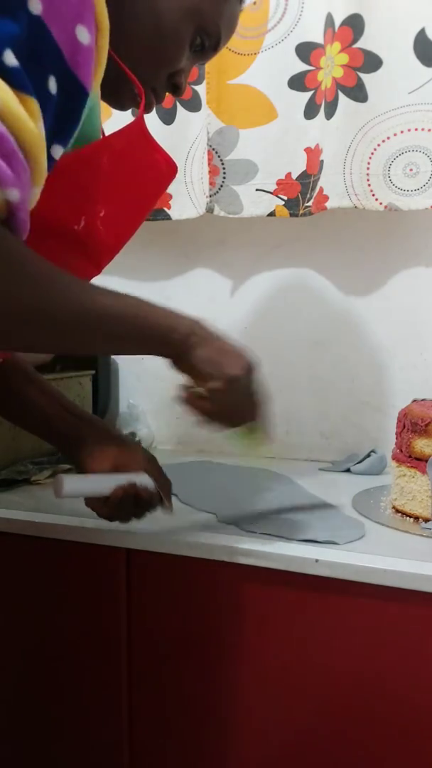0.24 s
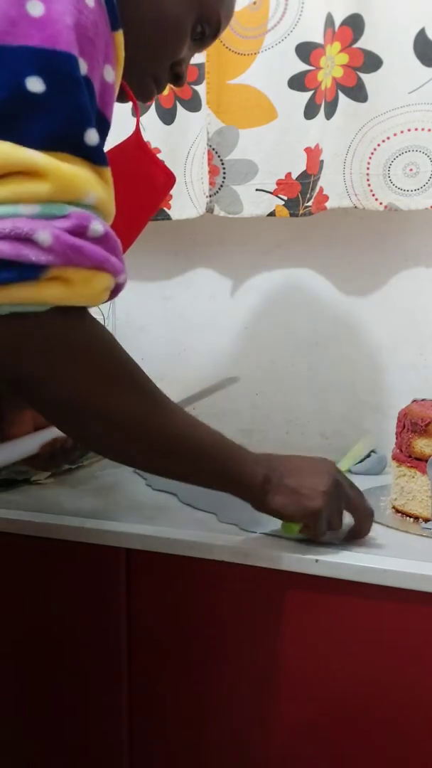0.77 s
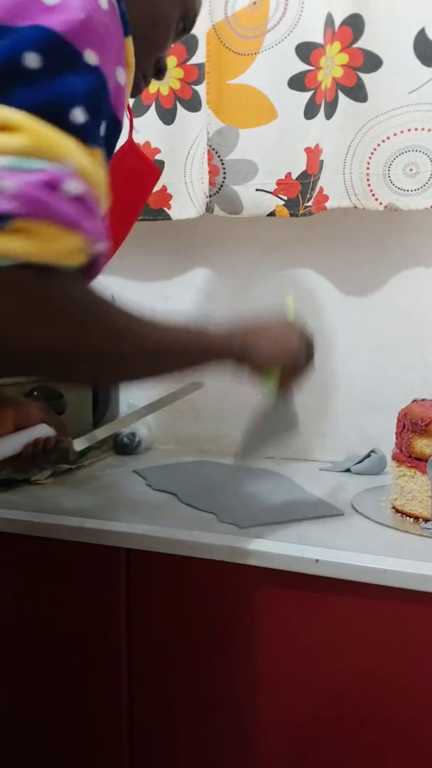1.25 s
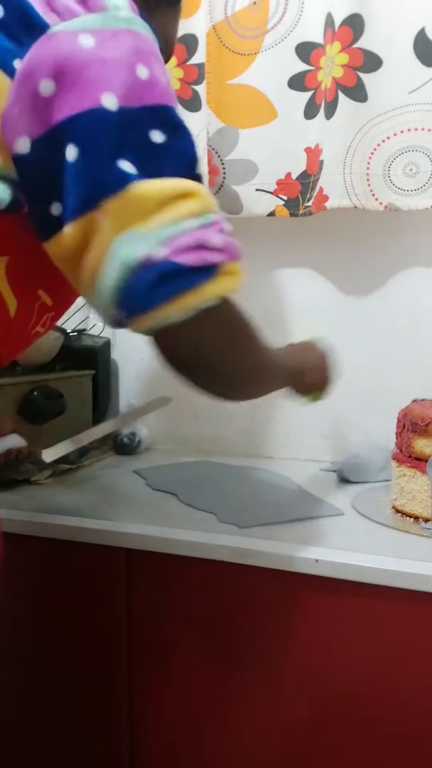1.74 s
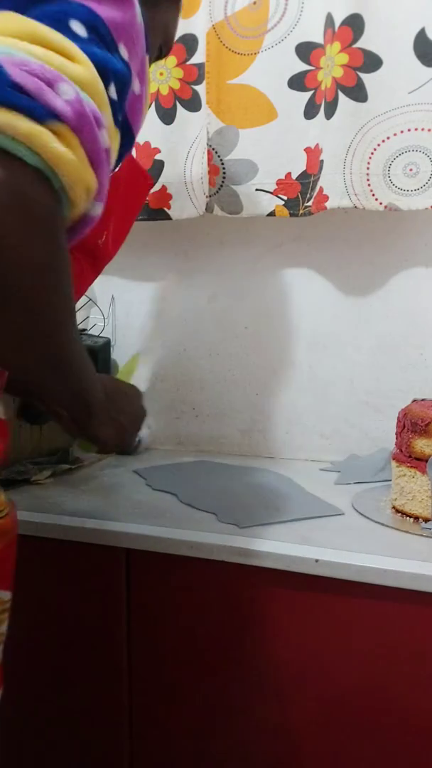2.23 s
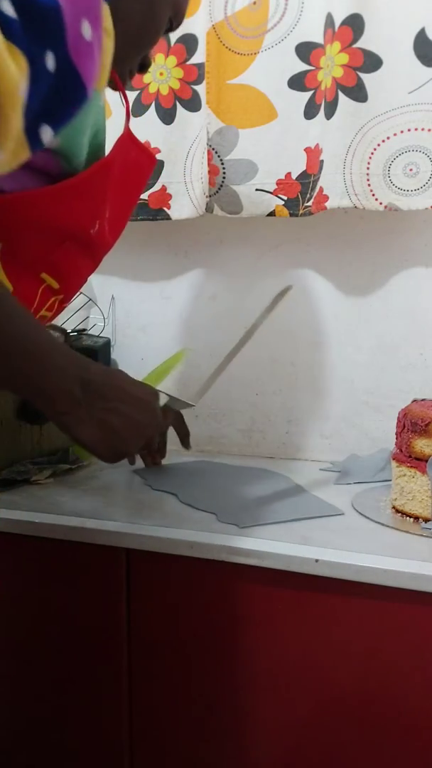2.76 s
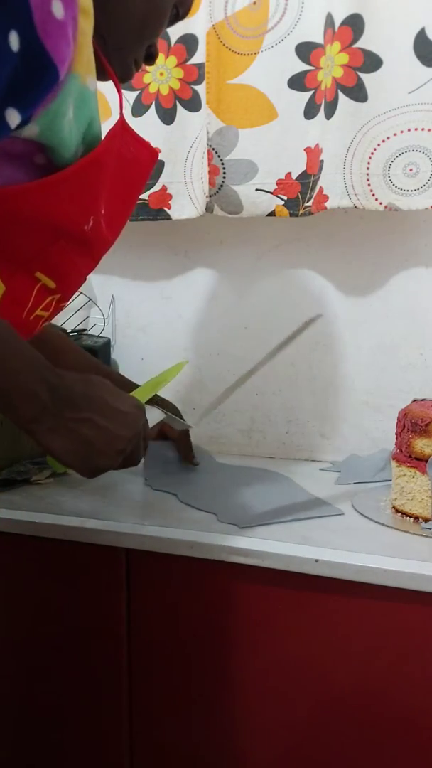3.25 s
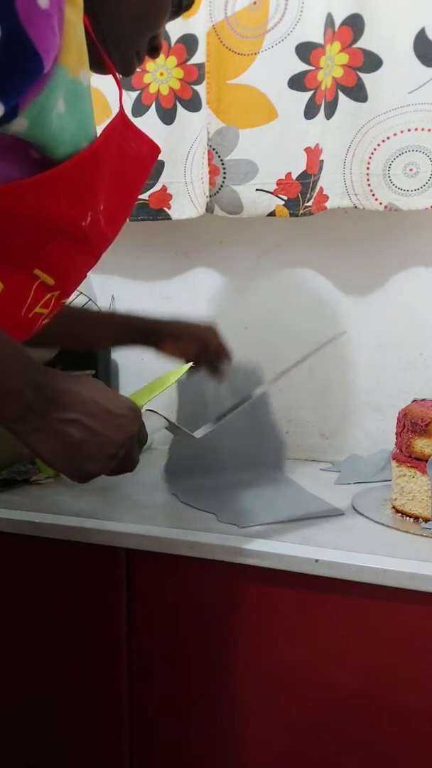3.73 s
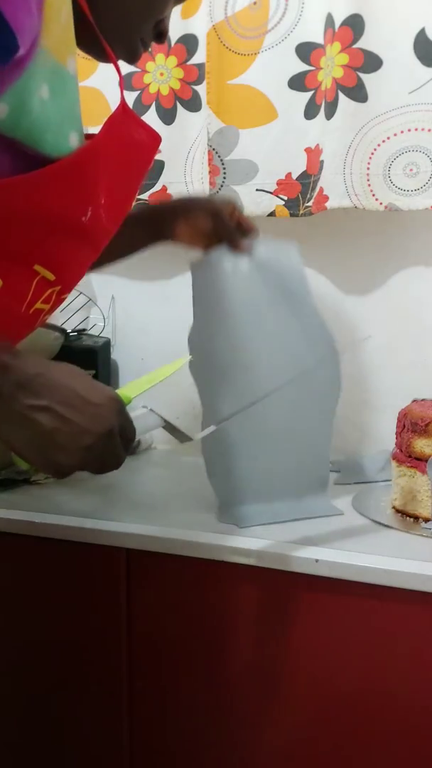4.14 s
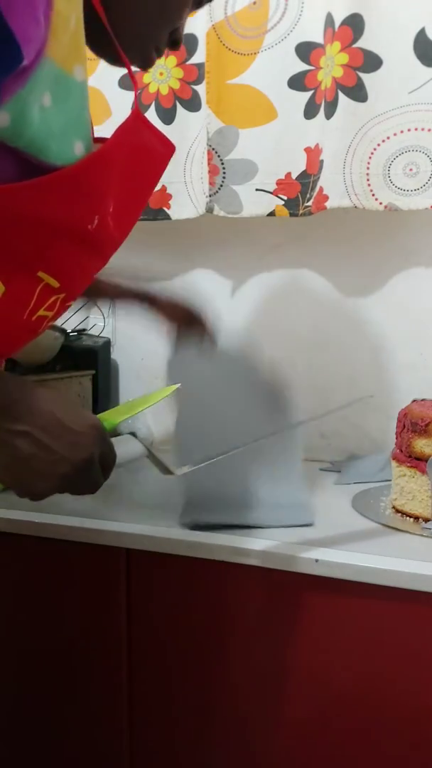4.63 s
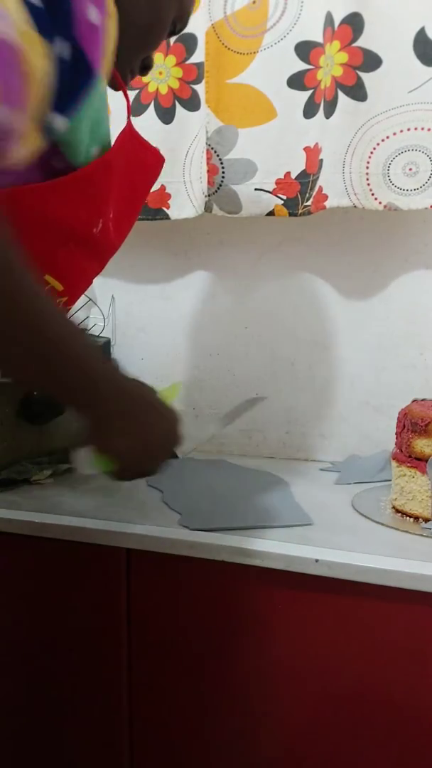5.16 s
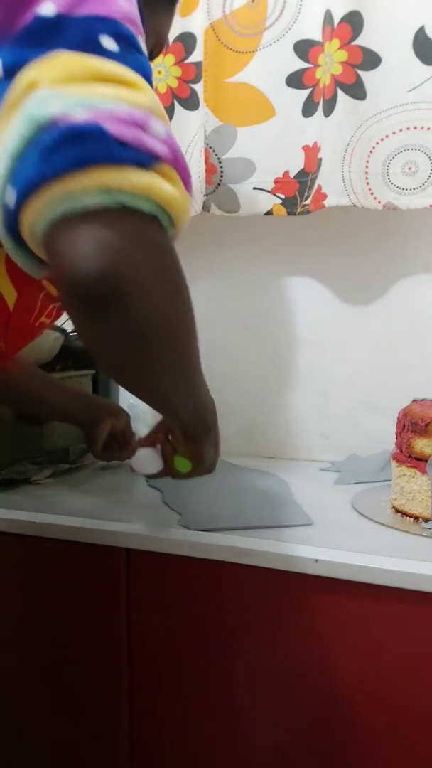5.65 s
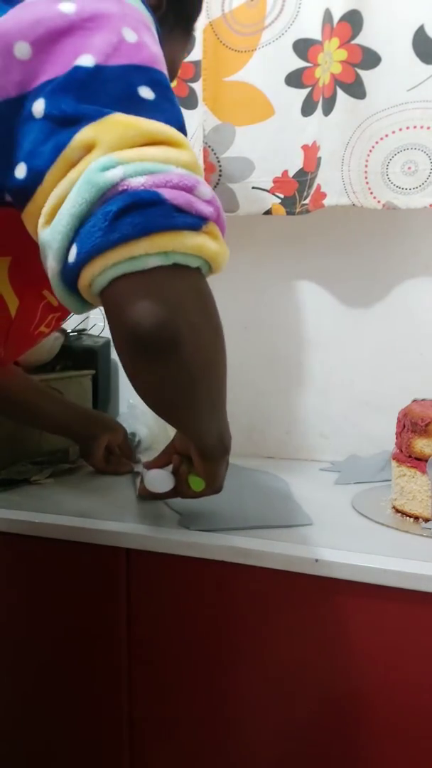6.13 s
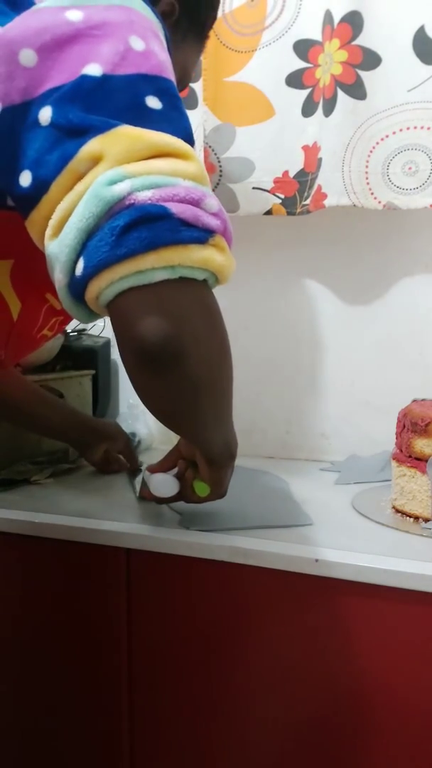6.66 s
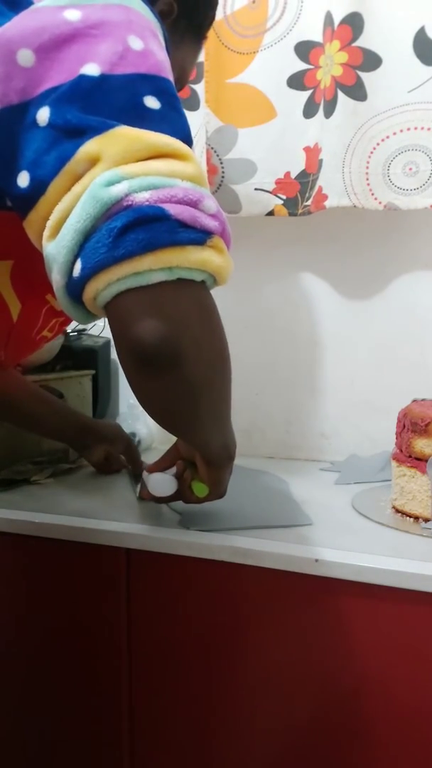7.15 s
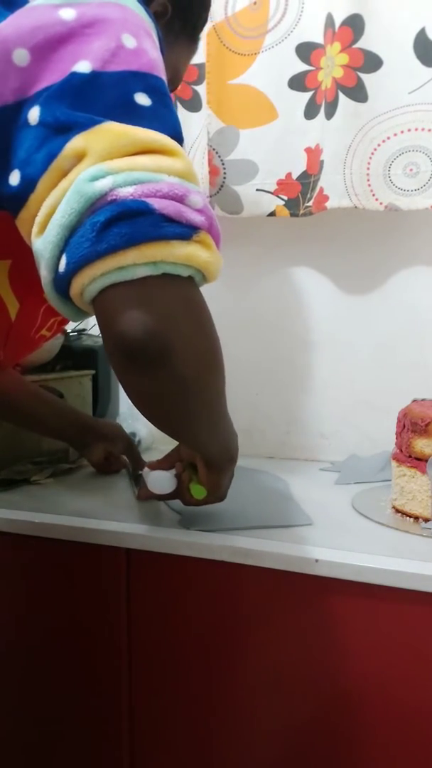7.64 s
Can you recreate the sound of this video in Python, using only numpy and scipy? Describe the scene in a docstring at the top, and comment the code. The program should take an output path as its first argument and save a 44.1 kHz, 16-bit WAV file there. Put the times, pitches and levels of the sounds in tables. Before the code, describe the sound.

A small hard-walled kitchen, heard fairly close in stereo, with a deep refrigerator hum near 100 Hz swelling and sinking over dull, dark room air. Right at 0 s a knife edge scrapes for about 0.15 s, gritty and uneven, with small catches and a slight blade ring. At 0.7 s a soft low boom comes from the counter. Faint cloth rustles pass by. At about 1.73 s tools knock together in a dry clustered clink lasting some 50 ms, mid-bright and quickly fading. Around 3.45-3.55 s there are soft finger touches with a low thump, then a very fine peeling hiss until about 4.4 s. At 4.6-4.8 s the sheet lands in a few louder soft pats with a low thud. After 5 s it is mostly hum, with faint rustles, including one airy brush near 6.4 s, and tiny dull taps near 7.27 s, until the end at about 7.9 s.

```python
"""A knife scrapes once through rolled icing on a kitchen counter: jerky slips of the edge, partly ringing in the blade.
Tools clink as struck resonances; the sheet is peeled up and laid down in soft pats, low counter booms and fine hiss.
A small hard kitchen answers scrape, clinks and pats with sparse echoes, heard by two unlike microphone ports.
Behind it a refrigerator hums on multiples of the mains over dull room air of shaped noise."""
import sys
import numpy as np
from scipy import signal
from scipy.fft import rfft, irfft, next_fast_len
from scipy.io import wavfile
from scipy.ndimage import uniform_filter1d

SR = 44100
rng = np.random.default_rng(int(sys.argv[2]) if len(sys.argv) > 2 else 0)


def pcm_store(signal):
    """Save signal as 16-bit PCM."""
    levels = np.round(np.clip(np.atleast_2d(signal), -1, 1) * 32767)
    wavfile.write(sys.argv[1], SR, levels.astype(np.int16).T)


N = 347949  # length in samples


def gain_of(db):
    """Decibels to gain."""
    return 10 ** (np.asarray(db) / 20)


def evened(x):
    """Scales to rms 1."""
    return x / np.sqrt(np.mean(x ** 2) + 1e-20)


def curve(points, t):
    """Reads a breakpoint table along a straight axis."""
    return np.interp(t, *np.transpose(points))


def read(points, hz):
    """Reads a spectrum table on a log axis."""
    f, value = np.transpose(points)
    return np.interp(np.log(hz + 1), np.log(f + 1), value)


def add(mix, s, sound):
    """Mixes a sound in at a time in seconds."""
    part = mix[round(s * SR):][:len(sound)]
    part += sound[:len(part)]


def coloured(x, points):
    """Filters by a spectrum table."""
    count = x.shape[-1]
    size = next_fast_len(count + 2048)
    gain = gain_of(read(points, np.fft.rfftfreq(size, 1 / SR)))
    return irfft(rfft(x, size) * gain, size)[..., :count]


def ringing(x, modes):
    """Sum of resonances, each of peak gain by its dB."""
    out = 0
    for hz, width, db in modes:
        b, a = signal.iirpeak(hz, hz / max(width, 5), SR)
        out = out + gain_of(db) * signal.lfilter(b, a, x)
    return out


def gliding(x, hz, width):
    """A resonance that follows the curve hz: shift down to zero, smooth, shift back up."""
    turn = np.exp(2j * np.pi * np.cumsum(hz) / SR)
    r = np.exp(-np.pi * width / SR)
    return 2 * (turn * signal.lfilter([1 - r], [1, -r], x / turn)).real


def grit(count, spread_db):
    """Noise of tiny slips, a few of them large."""
    size_db = spread_db * np.minimum(rng.exponential(1, count), 5)
    return evened(rng.standard_normal(count) * gain_of(size_db))


def slow(per_s):
    """A smooth random drift of rms 1, made of sines up to per_s Hz."""
    t = np.arange(0, N + 256, 256) / SR
    drift = 0
    for f in np.geomspace(per_s / 10, per_s, 16):
        drift = drift + np.sin(2 * np.pi * (f * t + rng.random())) / np.sqrt(f)
    return np.interp(np.arange(N), 256 * np.arange(len(t)), evened(drift))


# Pressure of the knife stroke. Each row: time in seconds, pressure in dB.
STROKE_PRESSURE = [(0, -28), (0.038, -30.5), (0.045, -27), (0.1, -29), (0.12, -24), (0.133, -30),
                   (0.15, -43)]
# The edge catches and jumps. Each row: time in seconds, added pressure in dB.
EDGE_CATCHES = [(0.045, -24.5), (0.057, -29), (0.069, -28.5), (0.077, -30), (0.098, -28), (0.111, -25.5),
                (0.118, -27), (0.13, -25), (0.139, -23.5)]
# Colour of the dry scrape. Each row: frequency in Hz, relative level in dB per Hz.
SCRAPE_COLOUR = [(120, -39.5), (200, -14.5), (462, -8), (677, -7.5), (939, -1.5), (1190, -10.5), (1500, -9),
                 (1940, -1.5), (3120, -4), (4100, -1), (11800, -9), (15400, -13.5)]
# Modes of blade and counter. Each row: centre in Hz before bending, width in Hz, relative gain in dB.
BLADE_MODES = [(444, 40, -4.5), (576, 55, 2), (780, 60, -1), (938, 39, 1.5), (1090, 55, 0),
               (1980, 230, -4.5), (2260, 62, -3), (4050, 85, -6.5), (4290, 45, 0.5), (4940, 60, -8),
               (7120, 190, -1.5), (5840, 55, -9), (11100, 86, -8)]
# Low note of the bending blade. Each row: time in seconds, pitch in Hz.
GROAN_PITCH = [(0, 483.4), (0.03, 319.6), (0.065, 281.6), (0.1, 451.5), (0.125, 597), (0.19, 539.5)]


def scrape(ring_db=-10.5, groan_db=-21, groan_width_hz=60., spread_db=3.0, bright=0.49, catch_s=.002, bend=.025):
    """Slips of the edge on the counter in uneven jerks, partly ringing in the blade."""
    s, pressure_db = np.transpose(STROKE_PRESSURE)
    t = np.arange(0, s[-1], 1 / SR)
    force = gain_of(curve(STROKE_PRESSURE, t))
    for at, jump_db in EDGE_CATCHES:
        force += gain_of(jump_db) * (t > at) * np.exp(-abs(t - at) / catch_s)
    slips = np.pad(grit(len(t), spread_db) * force, (0, SR // 4))  # room for the ring to die

    t = np.arange(len(slips)) / SR
    pressure = gain_of(curve(STROKE_PRESSURE, t) - pressure_db.max())
    slips += bright * np.diff(slips, prepend=0) * pressure  # pressure brightens
    level = np.linalg.norm(slips)
    dry = coloured(slips, SCRAPE_COLOUR)

    flex = 1 + bend * slow(40.0)[:len(t)]  # the blade bends, so its modes drift
    ring = sum(gain_of(db) * gliding(slips, hz * flex, width) for hz, width, db in BLADE_MODES)
    groan = gliding(slips, curve(GROAN_PITCH, t), groan_width_hz)
    parts = (0, dry), (ring_db, ring), (groan_db, groan)
    return level * sum(gain_of(share_db) * part / np.linalg.norm(part) for share_db, part in parts)


# Tools knocked together. Each row: start in seconds, relative level in dB.
CLINK_HITS = [(1.729, -36.5), (1.733, -27), (1.740, -26), (1.750, -26.5), (1.76, -34), (1.77, -39),
              (1.781, -40)]
# Resonances of the tools. Each row: centre in Hz before detuning, width in Hz, relative gain in dB.
TOOL_MODES = [(714, 230, -22), (1070, 130, -6), (1290, 90, 1), (2050, 93, 8), (2320, 120, -6),
              (2640, 90, 7), (3000, 140, -5), (3610, 120, -11), (4000, 200, -17), (6700, 300, -7)]
# Colour of the dull crack. Each row: frequency in Hz, relative level in dB per Hz.
CRACK_COLOUR = [(300, -3.5), (1200, 0), (2200, 9), (5000, -7.5), (8000, -15), (15000, -43)]


def clinks(tick_db=3.0, tick_s=0.0025, detune=.018):
    """Each knock is a short dull crack that also rings the tools, held a little differently each time."""
    out, t = np.zeros(N), np.arange(SR // 10) / SR
    for s, db in CLINK_HITS:
        blow = grit(len(t), 1.6) * np.exp(-t / tick_s)
        # only the centre column is detuned
        hold = 1 + detune * rng.standard_normal((len(TOOL_MODES), 1)) * [1, 0, 0]
        ring = ringing(blow, np.array(TOOL_MODES) * hold)
        crack = coloured(blow, CRACK_COLOUR)
        knock = ring / abs(ring).max() + gain_of(tick_db) * crack / abs(crack).max()
        add(out, s, gain_of(db) * knock)
    return out


# The sheet and fingers meet the counter. Each row: start in seconds, relative level in dB, length in seconds,
# dull centre in Hz, share near 5 kHz in dB, share near 13 kHz in dB, share of the note in dB.
SOFT_TOUCHES = [(3.443, -56, 0.015, 2620, -8, -22, -10), (3.452, -51.5, 0.04, 1310, -16, -28, -16),
                (3.46, -58, 0.039, 2860, 0, -11, -4), (3.49, -57, .008, 2200, -6, -11, -18),
                (3.523, -51.5, 0.014, 2000, 8, 4, -25), (3.541, -61, 0.053, 1100, -2, -2, -5),
                (4.593, -50.5, 0.012, 1700, -26, -31, -23), (4.609, -51, 0.011, 1150, -14, -22, -22),
                (4.625, -52, 0.011, 1250, -13, -28, -22), (4.683, -39, 0.013, 1500, 2.5, -4, -25),
                (4.704, -41, 0.023, 1390, -6, -15, -26), (4.73, -40.5, 0.0094, 1910, -4, -8, -18),
                (4.773, -51, 0.017, 2600, -4, -13, -20), (4.812, -63.5, .04, 2000, -3, -12, -19),
                (7.258, -56.5, 0.0053, 2130, -29, -44, -7), (7.274, -60, 0.011, 870, -25, -44, 2),
                (7.288, -65, 0.016, 2200, -29, -44, -15)]


def pats(fall_s=0.011, first=1.6, first_s=0.00029, sharp=12.0):
    """Soft contact: a burst of grit with a broad dull hump, a share of treble and a short note at the hump."""
    out, t = np.zeros(N), np.arange(SR // 5) / SR
    for s, db, length, hz, mid_db, top_db, note_db in SOFT_TOUCHES:
        hold = np.exp(-np.maximum(t - length, 0) / fall_s)
        snap = first * np.exp(-t / first_s)  # the first touch snaps
        onset = np.minimum(t / 0.00032, 1)
        hump = [(hz / 4, -8), (hz, 0), (hz * 1.1, .5 * mid_db),
                (5000, mid_db), (8800, top_db + 2.5), (13000, top_db)]
        touch = grit(len(t), 2.2)
        note = evened(ringing(touch, [(hz, hz / sharp, 0)]))
        sound = evened(coloured(touch, hump)) + gain_of(note_db) * note
        add(out, s, gain_of(db) * sound * (hold + snap) * onset)
    return out


# Low booms of the counter top, and two faint swells near 490 Hz in the background (at 1.029 and 2.151 s).
# Each row: start in seconds, level before rise and decay in dB, pitch in Hz, 60 dB decay in seconds.
BOOMS_AND_SWELLS = [(0.68, -28, 95.5, 0.69), (1.731, -43.5, 488, 0.11), (1.735, -46, 704, 0.066),
                    (3.463, -31, 259, 0.083), (3.491, -22.5, 124, 0.069), (4.676, -25, 97, 0.1),
                    (4.681, -35.5, 270, 0.07), (4.729, -44, 395, 0.1), (1.029, -52, 497, 0.2),
                    (2.151, -43, 487, 0.05)]


def booms(rise_cycles=0.93):
    """Each boom or swell is one decaying sine with a soft rise, like a panel mode pushed gently."""
    out, t = np.zeros(N), np.arange(SR // 2) / SR
    for s, db, hz, t60 in BOOMS_AND_SWELLS:
        rise = 1 - np.exp(-t * hz / rise_cycles)
        add(out, s, gain_of(db - 60 * t / t60) * rise * np.sin(2 * np.pi * hz * t))
    return out


# Single rubs of cloth and icing. Each row: loudest moment in seconds, length in seconds,
# relative level near 6 kHz in dB, relative level near 13 kHz in dB.
CLOTH_RUBS = [(0.318, 0.11, -85, -72), (0.448, 0.13, -69, -68), (0.72, 0.057, -78, -74.5),
              (0.82, 0.19, -72.5, -82.5), (0.909, 0.18, -73, -74), (1.132, 0.17, -70, -64),
              (1.652, 0.62, -71, -89), (2.058, 0.13, -67, -74), (2.198, 0.28, -72.5, -75),
              (2.31, 0.14, -73.5, -79), (2.697, 0.066, -75, -68), (2.98, 0.042, -75, -80),
              (3.157, 0.17, -75, -68), (3.28, 0.049, -69, -75), (4.862, 0.22, -71, -73),
              (6.158, 0.073, -77.5, -76), (6.412, 0.098, -71, -61.5), (7.185, 0.07, -74, -73),
              (7.278, .06, -95, -75), (7.468, 0.038, -81, -75), (7.71, 0.077, -83, -95)]
RUB_RISE, RUB_END_DB = 0.37, -8.5  # share of the length spent rising; level at both ends
# The sheet is peeled off the counter.
# Each row: time in seconds, relative level near 6 kHz in dB, relative level near 13 kHz in dB.
PEEL_LEVELS = [(3.42, -77, -79), (3.58, -66, -62), (3.72, -72, -58.5), (3.88, -74, -61), (4.09, -79, -67),
               (4.33, -74, -65.5), (4.42, -79, -93)]
# Faint stirring between the rubs, strongest at the very start.
# Each row: time in seconds, relative level near 6 kHz in dB, relative level near 13 kHz in dB.
STIR_LEVELS = [(0, -72, -76.5), (1.2, -82, -83), (3.4, -79, -82), (4.5, -81, -87.5), (7.89, -83, -86.5)]


def rustle_levels(t, stir_db=2.5):
    """Gains of the two hiss bands: rubs arch up and down, the peel follows its curve, the stirring drifts."""
    stir_s, *stir_bands = np.transpose(STIR_LEVELS)
    peel_s, *peel_bands = np.transpose(PEEL_LEVELS)
    power = gain_of([np.interp(t, stir_s, band) + stir_db * slow(4.4)[::64] for band in stir_bands]) ** 2
    power += gain_of([np.interp(t, peel_s, band, -200, -200) for band in peel_bands]) ** 2
    for s, length, *levels_db in CLOTH_RUBS:
        away = (t - s) / np.where(t < s, RUB_RISE * length, (1 - RUB_RISE) * length)
        arch_db = RUB_END_DB * np.minimum(away ** 2, 20)
        power += gain_of(np.array(levels_db)[:, None] + arch_db) ** 2
    return np.sqrt(power)


# Colour of the lower hiss. Each row: frequency in Hz, relative level in dB per Hz.
SWISH_COLOUR = [(1500, -14), (3600, -11.5), (5000, -6), (7000, -2), (8300, -15.5), (11000, -23)]
# Colour of the upper hiss. Each row: frequency in Hz, relative level in dB per Hz.
FIZZ_COLOUR = [(5000, -33), (9000, -13), (11500, -2), (14500, 1.5), (16000, 4)]
# While the arm sweeps wide the rustle also whistles. Each row: centre in Hz, width in Hz, relative gain in dB.
WHISTLE_MODES = [(4200, 450, 0)]
# How much of it whistles. Each row: time in seconds, mean share in dB.
WHISTLE_AMOUNT = [(2.4, -10), (2.8, -20)]


def rustle(flicker_db=1.5):
    """Fibres and sticky icing let go in a fine hiss, unrelated in the two ports."""
    t = np.arange(N) / SR
    levels = rustle_levels(t[::64]).repeat(64, 1)[:, :N]
    swish_gain, fizz_gain = levels * gain_of(flicker_db * slow(40.0))
    fibres = grit(2 * N, 1.5).reshape(2, N)
    whistle_db = curve(WHISTLE_AMOUNT, t) + 2.5 * slow(25.0)  # comes and goes
    whistle = evened(ringing(fibres, WHISTLE_MODES)) * gain_of(whistle_db)
    swish = evened(coloured(fibres, SWISH_COLOUR)) + whistle
    fizz = evened(coloured(fibres, FIZZ_COLOUR))
    return swish * swish_gain + fizz * fizz_gain


# Decay of the small hard kitchen. Each row: frequency in Hz, 60 dB decay in seconds.
KITCHEN_DECAY = [(300, 0.3), (1000, 0.21), (4000, 0.19), (12000, 0.19)]
# Long waves reach both ports alike. Each row: frequency in Hz, left-right likeness from 0 to 1.
ECHO_LIKENESS = [(200, 0.9), (450, 0.81), (1000, 0.16)]


def echoes():
    """Sparse taps of random sign, alike in both ports only in the bass, each band dying at its own speed."""
    taps = np.zeros((2, SR // 2))
    starts = np.arange(60, SR // 2 - 20, 20)  # one tap in every 20 samples
    at = starts + rng.integers(0, 20, (2, len(starts)))
    np.put_along_axis(taps, at, rng.choice([-1., 1.], at.shape), 1)
    hz, t, z = signal.stft(taps, SR, nperseg=256)
    same = np.clip(read(ECHO_LIKENESS, hz), 0, 1)[:, None]
    z = np.array([z[0], same * z[0] + np.sqrt(1 - same ** 2) * z[1]])
    decay = gain_of(-60 * t / read(KITCHEN_DECAY, hz)[:, None])
    tail = signal.istft(z * decay, SR, nperseg=256)[1]
    return tail / np.linalg.norm(tail[0])


def kitchen(x, turns_per_s=28.0):
    """Three sets of echoes fade into one another in turn, so the room's colour keeps changing."""
    turn = 2 * np.pi * turns_per_s * np.arange(N) / SR
    out = 0
    for k in range(3):
        share = np.sqrt(2 / 3) * np.cos(turn + k * np.pi / 3)  # the three powers add up to 1
        out = out + signal.fftconvolve(x[None] * share, echoes(), axes=1)[:, :N]
    return out


MAINS_HZ = 50.018
# The hum swells and sinks; its strongest partial, twice the mains. Each row: time in seconds, rms level in dB.
DRONE_LEVEL = [(0.0, -32), (0.75, -33.5), (1.1, -27.5), (1.58, -33), (1.92, -34), (2.13, -30.5),
               (2.45, -33.5), (3.0, -34), (3.45, -31.5), (3.92, -38), (4.11, -32), (4.62, -39.5),
               (5.03, -34), (5.19, -34), (5.35, -40), (5.93, -37.5), (6.1, -33.5), (6.33, -40),
               (6.74, -29.5), (7.21, -39), (7.58, -32), (7.89, -36.5)]
# Hum partials besides the strongest. Each row: multiple of the mains, mean rms level in dB,
# left-right difference in dB, radians by which left leads.
HUM_PARTIALS = [(3, -53, -0.5, 0.24), (5, -63, -3, 1), (6, -63.5, -3.5, -0.47), (7, -61.5, -5.5, -1.3),
                (8, -70, 0.5, -0.2), (10, -74, 0.5, 0.88), (11, -78.5, -1, 0), (16, -76, -5, 0.47),
                (20, -78.5, -5, 1.76)]


def fridge(drone_pan_db=1.3, drone_lead=-.08, waver_db=1.3, wander=.003):
    """Steady partials locked to the mains, the weak ones wavering; drone_lead is radians by which left leads."""
    t = np.arange(N) / SR
    side = np.array([[.5], [-.5]])  # left, right
    turn = 2 * np.pi * MAINS_HZ * t
    out = gain_of(curve(DRONE_LEVEL, t) + side * drone_pan_db) * np.sin(2 * turn + side * drone_lead)
    for k, db, pan_db, lead in HUM_PARTIALS:
        phase = 2 * np.pi * rng.random() + wander * k ** 2 * slow(11.0)  # the higher, the fuzzier
        level_db = db + waver_db * (1 + k / 10) * slow(3.0) + side * pan_db
        out += gain_of(level_db) * np.sin(round(k) * turn + phase + side * lead)
    return np.sqrt(2) * out  # rms to peak


# Colour of the room air. Each row: frequency in Hz, relative level in dB per Hz.
AIR_COLOUR = [(25, -18.5), (60, -17), (90, 1), (130, 1.5), (200, -6.5), (350, -9.5), (480, -21.5),
              (1150, -20.5), (1520, -23.5), (1760, -34.5), (6500, -49), (8500, -54), (13000, -41.5),
              (15500, -46.5)]
# The room favours some pitches of the air. Each row: frequency in Hz, lift in dB.
AIR_PITCHES = [(430, 5.5), (610, 5), (920, 2.5), (986, 2), (1066, 5.5), (1215, 6)]
# Likeness of the air in the ports. Each row: frequency in Hz, left-right likeness from -1 to 1.
AIR_LIKENESS = [(25, 0.89), (70, 1.0), (150, 0.83), (380, 0.99), (950, -0.14), (2380, -0.05), (5980, -0.53),
                (15000, -0.14)]
# Lean of the air. Each row: frequency in Hz, left-right difference in dB.
AIR_LEAN = [(60, -1), (130, -2), (290, -4.5), (640, -3), (1410, -2), (3100, -2), (6820, 0), (15000, -5.5)]
# The low air follows the hum. Each row: frequency in Hz, share of its swell.
HUM_SWELL_SHARE = [(120, 0.21), (200, 0.59), (500, 0.055)]
# Rise and fall of the air's middle band. Each row: time in seconds, relative level in dB.
MIDS_LEVEL = [(0.3, -60), (0.57, -62.5), (4.94, -63), (5.45, -64.5), (6.63, -62.5), (7.85, -65)]
# How far each pitch follows the middle band. Each row: frequency in Hz, share of that rise and fall.
MIDS_FOLLOW = [(330, 0.38), (480, 1), (1500, 1), (2200, 0.5)]


def air(level_db=-50, patchy_db=3.0, mode_half_width_hz=14, drone_mean_db=-34, mids_mean_db=-63):
    """Fan and street noise: random short-time spectra with drifting patches, most alike in the ports at low pitch."""
    frames, hz = N // 512 + 5, np.fft.rfftfreq(2048, 1 / SR)
    t = np.arange(frames) * 512 / SR
    a, b, c, d, patches = rng.standard_normal((frames, 1025, 5)).T
    patches = evened(uniform_filter1d(uniform_filter1d(patches, 16, 0), 8, 1))

    same = np.clip(read(AIR_LIKENESS, hz), -1, 1)[:, None]
    left = a + 1j * b
    z = np.array([left, same * left + np.sqrt(1 - same ** 2) * (c + 1j * d)])
    lean = np.array([.5, -.5])[:, None, None] * read(AIR_LEAN, hz)[:, None]

    mids_share = read(MIDS_FOLLOW, hz)[:, None]
    swell = read(HUM_SWELL_SHARE, hz)[:, None] * (curve(DRONE_LEVEL, t) - drone_mean_db)
    swell += mids_share * (curve(MIDS_LEVEL, t) - mids_mean_db)
    modes_db = sum(db / (1 + ((hz - at) / mode_half_width_hz) ** 2) for at, db in AIR_PITCHES)
    colour = (read(AIR_COLOUR, hz) + modes_db)[:, None]
    patch_depth_db = patchy_db * (0.63 + 0.31 * mids_share)  # the middle band is patchiest
    z *= gain_of(colour + lean + swell + patch_depth_db * patches)
    noise = signal.istft(z, nperseg=2048, noverlap=1536)[1][:, :N]
    return gain_of(level_db) * evened(noise)


# Lean of the near sounds. Each row: frequency in Hz, left-right difference in dB.
PORT_LEAN = [(60, 2), (130, -2), (290, 0), (640, -1), (1410, -5), (3100, -2), (6820, -2), (15000, -13)]
PORT_LAG = 9  # samples by which the direct sound reaches the right port later


def scene():
    """Contacts, echoes and rustle are tinted by each port; booms, hum and air are laid under them."""
    knocks, contacts = clinks(), pats()
    add(contacts, 0, scrape())
    direct = gain_of(-10.5) * contacts + gain_of(-6) * knocks  # the knock is close and dry
    room = gain_of(-4.0) * kitchen(contacts + gain_of(-2) * knocks)
    near = np.array([direct, np.roll(direct, PORT_LAG)]) + room + rustle()
    hz, lean_db = np.transpose(PORT_LEAN)
    left = coloured(near[0], np.c_[hz, lean_db / 2])
    right = coloured(near[1], np.c_[hz, -lean_db / 2])
    return np.array([left, right]) + booms() + fridge() + air()


def record(dry, edge_hz=15560):
    """The band limit: a steep low-pass on both ports."""
    low_pass = signal.firwin(1023, edge_hz, window=("kaiser", 9), fs=SR)
    return signal.oaconvolve(dry, low_pass[None], "same")


dry = scene()
out = record(dry)
pcm_store(out)
```